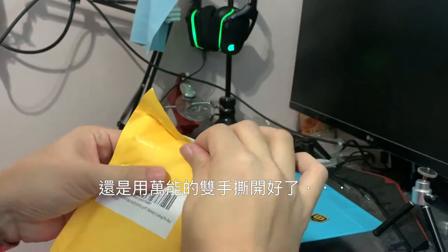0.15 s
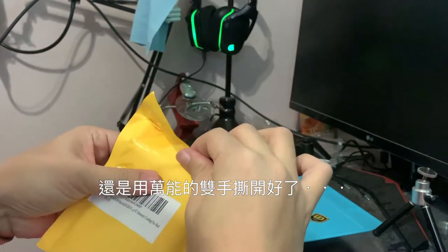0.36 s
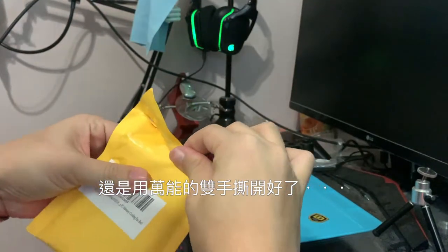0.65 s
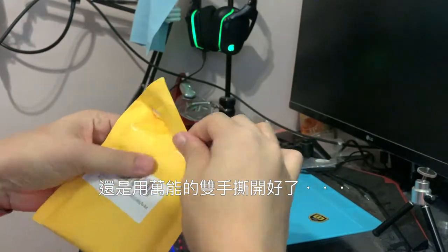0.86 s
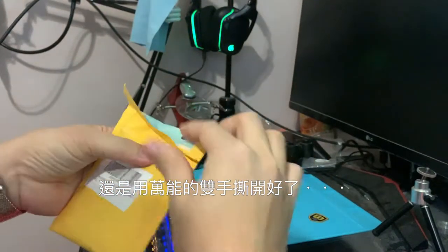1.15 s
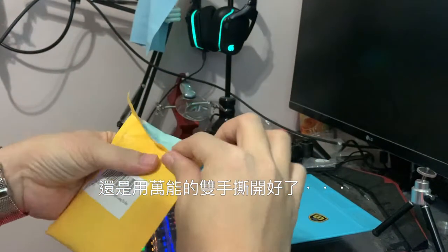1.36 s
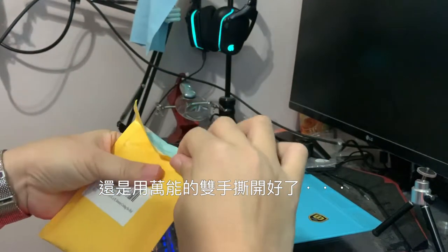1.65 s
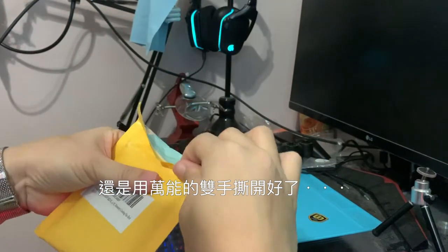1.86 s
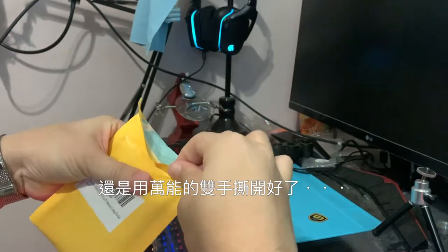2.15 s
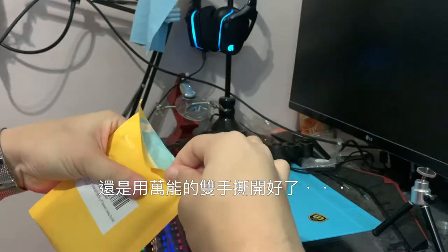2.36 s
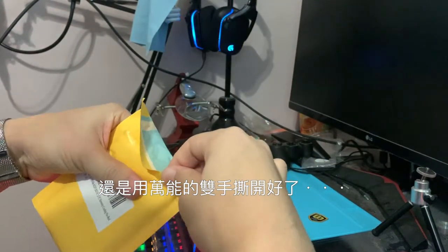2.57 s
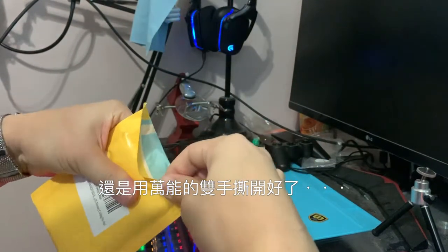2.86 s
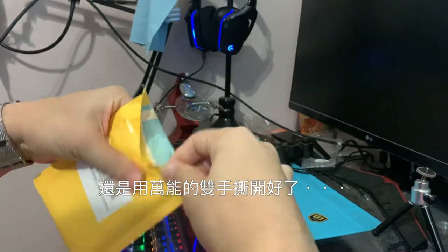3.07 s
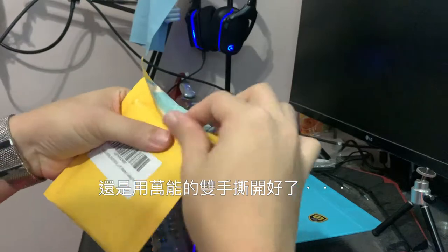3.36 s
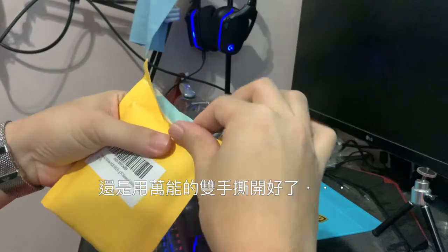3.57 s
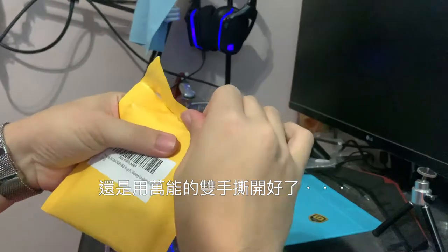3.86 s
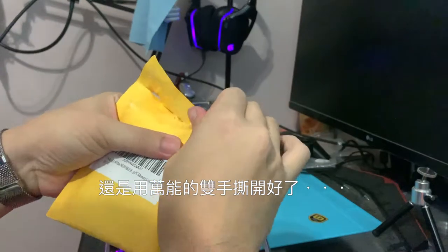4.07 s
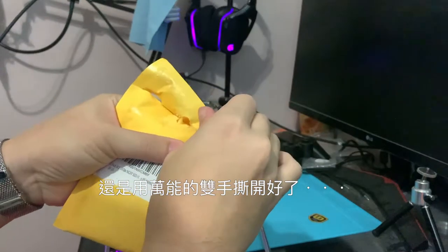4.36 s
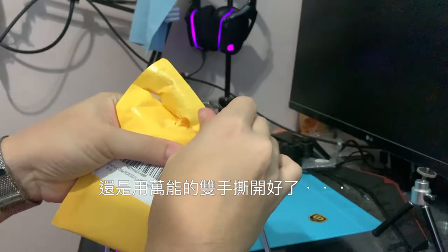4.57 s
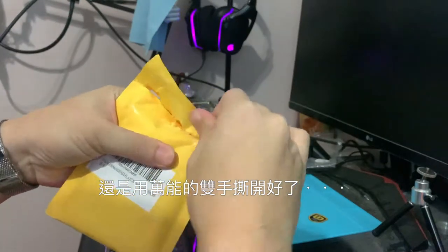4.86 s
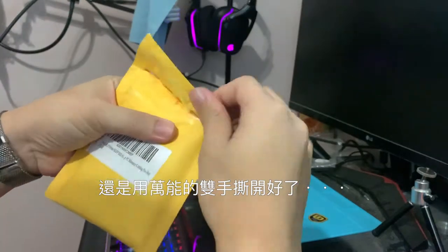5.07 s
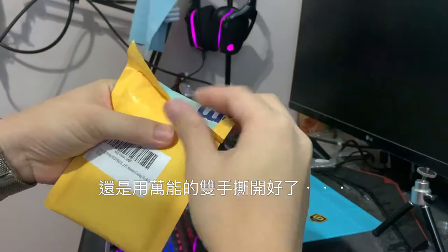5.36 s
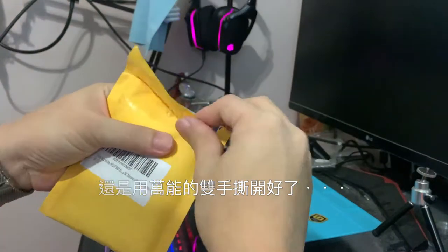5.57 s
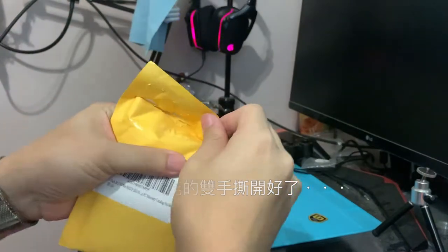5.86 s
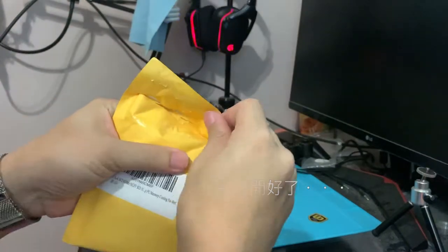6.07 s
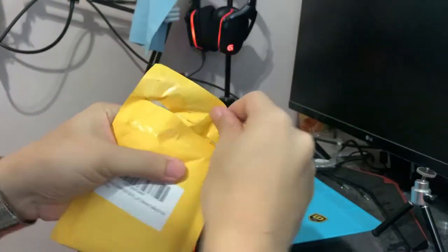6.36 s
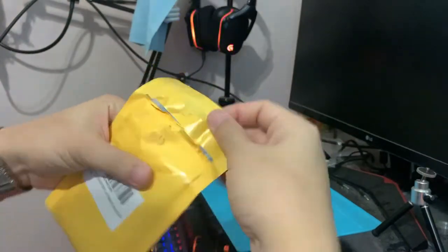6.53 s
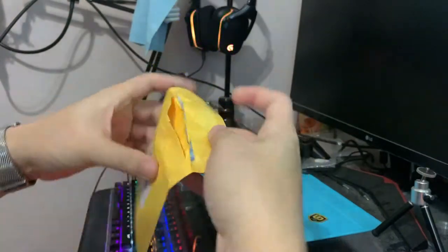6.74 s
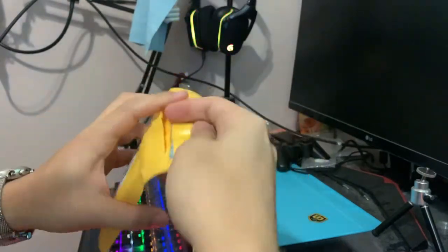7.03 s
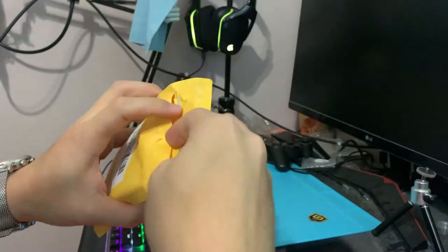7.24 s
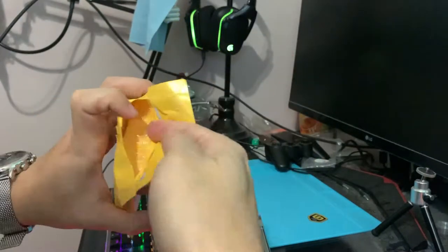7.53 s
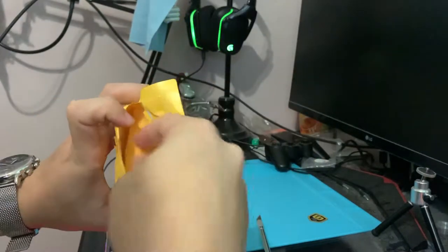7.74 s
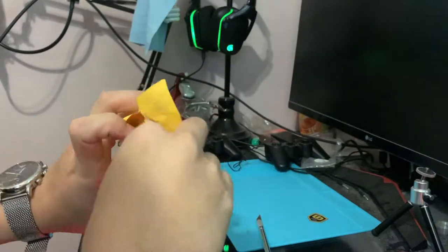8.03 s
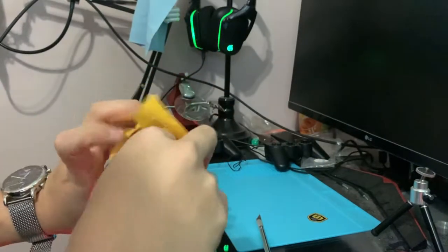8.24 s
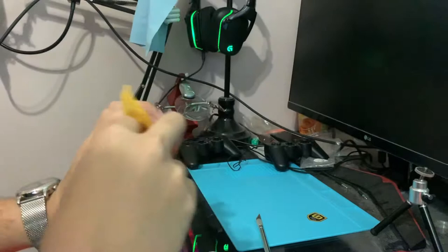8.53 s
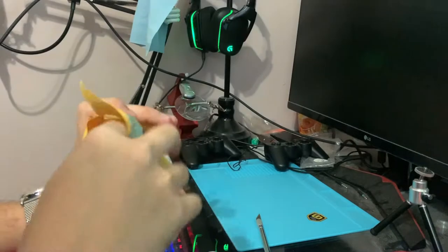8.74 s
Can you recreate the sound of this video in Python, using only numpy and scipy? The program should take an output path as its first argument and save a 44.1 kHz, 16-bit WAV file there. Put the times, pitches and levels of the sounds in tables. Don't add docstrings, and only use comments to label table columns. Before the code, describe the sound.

Close to a small microphone in a small room, hands work a padded paper envelope. Grainy rubbing, creasing snaps and tiny fibre crackles come in uneven bursts, then sharp ticks as the glue gives way. The flap rips in loud snaps, and fingers push the pouch open with hollow rustles and soft low thumps. A steady low fan hum runs throughout, deepening slightly past the middle.

```python
import sys
import numpy as np
from scipy import signal
from scipy.fft import rfft, irfft, next_fast_len
from scipy.io import wavfile
from scipy.ndimage import uniform_filter1d

SR = 44100
rng = np.random.default_rng(int(sys.argv[2]) if len(sys.argv) > 2 else 0)


def gain_from_db(level_db):
    decades = np.asarray(level_db, float) / 20
    return 10 ** decades


def to_wav(s):
    ch = np.atleast_2d(s).T
    pcm = np.round(np.clip(ch, -1, 1) * 32767)
    wavfile.write(sys.argv[1], SR, pcm.astype(np.int16))


N = 392490


def evened(x):
    return x / np.sqrt(np.mean(x ** 2) + 1e-20)


def read(points, hz):
    f, value = np.transpose(points)
    return np.interp(np.log(hz + 1), np.log(f + 1), value)


def add(mix, s, sound):
    part = mix[round(s * SR):][:len(sound)]
    part += sound[:len(part)]


# f/Hz, density/dB per Hz
AIR_SPECTRUM = [(18, -36), (30, 4.5), (65, 3), (109, -3), (255, 3), (443, -2), (676, -5.5), (979, -10.5),
                (1240, -10.5), (2740, -26), (6210, -48), (7880, -48), (14500, -42), (16500, -64)]
# f/Hz, width/Hz, level/dB
FAN_TONES = [(73.8, 3.2, -71.5), (136, 14.5, -67.5), (195, 11.3, -67.5), (234, 40, -66)]


def hum():
    air_db = -56.5
    blower_s, blower_hz, blower_db = 5.08, 130, -66.5
    size = next_fast_len(N)
    hz = np.fft.rfftfreq(size, 1 / SR)
    a, b = rng.standard_normal((2, len(hz)))
    out = gain_from_db(air_db) * evened(irfft((a + 1j * b) * gain_from_db(read(AIR_SPECTRUM, hz)), size))
    for f, width_hz, db in FAN_TONES:
        resonance = 1 / (1 + (2 * (hz - f) / width_hz) ** 2)
        out += gain_from_db(db) * evened(irfft((b + 1j * a) * resonance, size))
    blower = gain_from_db(blower_db) * evened(irfft((a - 1j * b) * hz / (1 + (hz / blower_hz) ** 6), size))
    fade_in = np.clip(10 * (np.arange(size) / SR - blower_s), 0, 1)
    return (out + blower * fade_in)[:N]


PAPER_EDGES_HZ = [620, 2500, 7000, 16300]


def shares(hz):
    above = [1 / (1 + (f / (hz + 1)) ** n) for f, n in zip(PAPER_EDGES_HZ, [3, 6, 6, -60])]
    body = above[0] * (1 - above[1])
    middle = above[1] * (1 - above[2])
    edge = above[2] * above[3] * 9000 / (hz + 2000)
    return np.array([body, middle, edge])


# t/s, effort/dB, body/dB re effort, edge/dB re effort
GRIP = [(0.0, -56.5, -2, -17), (0.45, -68.5, 3.5, -13), (0.82, -74, 3, -5), (1.2, -60, 2, -7),
        (1.75, -61.5, -7, -15), (1.95, -70.5, 0, -14), (2.9, -74, -28, -15), (3.14, -69.5, 7, -6),
        (3.5, -65.5, 0, -9), (3.92, -70, -7, -8), (4.2, -65, -7, 1), (4.7, -72, -3, -9),
        (5.5, -75.5, 5, -10), (5.7, -63.5, -7, -7), (6.1, -71, 4.5, -11), (6.93, -65.5, -2, -15),
        (7.9, -61, -4, -3), (8.9, -66.5, -1, -6)]
# t/s, hold/s, effort/dB, body/dB re effort, edge/dB re effort
STROKES = [(1.27, 0.029, -49.5, -4, -6), (1.524, 0.016, -53.5, -2, -9), (1.666, 0.0031, -49, 1.5, -10),
           (1.771, 0.068, -54.5, -2.5, -8), (2.564, 0.16, -70, -9, -7), (3.35, 0.0069, -55.5, 1, -13),
           (4.24, 0.16, -63, 0, 4), (3.43, 0.077, -62, 2, -5), (5.131, 0.12, -56, -1.5, -2.5),
           (5.3, 0.06, -52, -4, -10), (5.587, 0.017, -62, 5, -12), (6.236, 0.053, -56.5, 0, -9),
           (6.595, 0.24, -54, -3.5, -3.5), (7.1, 0.12, -58.5, -16, -6), (7.229, 0.0037, -49.5, -0.5, -4),
           (7.381, 0.16, -58, 4, -1), (7.634, 0.0038, -50.5, -10, 0), (7.995, 0.067, -51, -4, -3),
           (8.538, 0.0038, -51.5, 2.5, 0), (8.66, 0.068, -58, 5, -6), (8.79, 0.035, -57.5, -2.5, -3)]
SLIPS = [(0.102, 0.014, -49.5, -5, -6), (0.985, 0.14, -52.5, -4.5, -10), (1.168, 0.0036, -43, -2.5, -8),
         (2.117, 0.022, -53.5, -2, -6), (4.362, 0.076, -54.5, 0, 4), (3.24, 0.0021, -43, -7, -9),
         (3.965, 0.025, -58, 0, -15), (4.56, 0.014, -50, -4.5, -1.5), (5.756, 0.035, -44, -0.5, -30),
         (5.79, 0.01, -45.5, -6, -1), (5.918, 0.014, -56, -4, 0), (6.328, 0.0031, -38, -6, -5),
         (8.071, 0.021, -45, -3, -21), (8.224, 0.075, -48, -2, -5), (8.32, 0.014, -45, -8, -6),
         (1.366, 0.044, -53.5, -8, -4)]


def effort():
    swell_db_per_s, ease_db_per_s = 282, 320
    jump_db_per_s, settle_db_per_s = 886, 248
    t = np.arange(0, N / SR + .01, .001)
    s, level, body, edge = np.transpose(GRIP)
    power = np.array([gain_from_db(2 * np.interp(t, s, level + c)) for c in (0, body, edge)])
    moves = ((STROKES, swell_db_per_s, ease_db_per_s), (SLIPS, jump_db_per_s, settle_db_per_s))
    for rows, rise, fall in moves:
        for at, hold_s, db, body_db, edge_db in rows:
            shape_db = db - rise * np.maximum(at - t, 0) - fall * np.maximum(t - at - hold_s, 0)
            power = power + gain_from_db(2 * (shape_db + np.array([[0], [body_db], [edge_db]])))
    total_db = 10 * np.log10(power)
    return t, total_db[0], total_db[1] - total_db[0], total_db[2] - total_db[0]


# t/s, length/s, f/Hz, boost/dB
POCKETS = [
    (1.545, 0.047, 3400, 8),
    (1.668, 0.04, 2880, 15.5),
    (7.646, 0.014, 1480, 7),
    (8.083, 0.034, 1330, 15.5),
    (8.09, 0.028, 2700, 12),
    (8.234, 0.064, 1070, 15.5),
    (8.276, 0.017, 1520, 15),
]


def rustle():
    grains_per_s, pocket_width = 700, 0.12
    clumps = evened(uniform_filter1d(uniform_filter1d(rng.standard_normal(N), size=500), size=500))
    size = gain_from_db(3.4 * np.minimum(rng.exponential(1, N), 2.1))
    size = size * (rng.random(N) < grains_per_s / SR * gain_from_db(4 * clumps))
    uneven = gain_from_db(4.5 * np.minimum(rng.standard_normal((3, N)), 1))
    grains = signal.lfilter([1], [1, -.92], size * uneven) * rng.standard_normal(N)

    s, *columns = effort()
    fused = gain_from_db(0.28 * (np.interp(np.arange(N) / SR, s, columns[0]) + 56))
    hiss = rng.standard_normal(N) * gain_from_db(1.5 * clumps)
    drive = (evened(grains) + fused * hiss) / np.sqrt(1 + fused ** 2)

    hz, t, z = signal.stft(drive, SR, nperseg=256, noverlap=192)
    effort_db, body_db, edge_db = (np.interp(t, s, c) for c in columns)
    layers = [row * share[:, None] for row, share in zip(z, shares(hz))]
    field = sum(gain_from_db(db) * x / np.sqrt(np.mean(abs(x) ** 2)) for db, x in zip([body_db, 0, edge_db], layers))

    folds = uniform_filter1d(rng.standard_normal(field.T.shape), size=14, axis=0)
    folds = uniform_filter1d(folds, size=7, axis=1).T
    colour_db = 3.02 * evened(folds)
    for at, length_s, pocket_hz, db in POCKETS:
        off_pitch = (hz[:, None] / pocket_hz - 1) / pocket_width
        colour_db = colour_db + db * np.exp(-((t - at) / length_s) ** 2 - off_pitch ** 2)
    plain = signal.istft(field, SR, nperseg=256, noverlap=192)[1]
    shaped = signal.istft(field * gain_from_db(effort_db + colour_db), SR, nperseg=256, noverlap=192)[1]
    return gain_from_db(0.5) * shaped[:N] / np.std(plain)


def snap(db, low_db, edge_db, crack, travel, bands):
    flip_gain, flip_s = 2.6, .00003
    dip_hz, dip_width, dip_db = 2350, 0.18, -5
    thin_hz, band_width = 694, 0.11
    t, hz = np.arange(len(crack)) / SR, np.fft.rfftfreq(len(crack), 1 / SR)
    late = np.maximum(t - .004, 0)
    ring_s = 0.0048 + 0.00053 * np.clip(low_db + 13, 0, 12)
    lasts_s = ring_s * np.array([[1.6], [1], [.7]])
    flip = flip_gain * np.exp(-((late - .0003) / flip_s) ** 2) * np.sign(crack[0])
    bursts = (crack * (1 - np.exp(-late / 0.00028)) + flip) * gain_from_db(-60 * late / lasts_s)

    spread = np.exp(-2j * np.pi * 0.0837 * (0.33 + travel) * (np.sqrt(hz) - hz / 140))
    dip = gain_from_db(dip_db * np.exp(-(np.log((hz + 1) / dip_hz) / dip_width) ** 2))
    shaping = dip / (1 + (thin_hz / (hz + 1)) ** 4)
    parts = irfft(rfft(bursts) * spread * shares(hz) * shaping)
    peaks = np.sqrt(uniform_filter1d(parts ** 2, size=64).max(axis=1))
    mixed = (gain_from_db(np.array([low_db - 4.0, 0, edge_db + 0.5])) / peaks) @ parts
    colour_db = sum(gain_db * np.exp(-(np.log((hz + 1) / f) / band_width) ** 2) for f, gain_db in bands)
    return gain_from_db(db) * irfft(rfft(mixed) * gain_from_db(colour_db))


# t/s, peak level/dB, low body/dB re peak, bright edge/dB re peak
PRYING = [(0.1013, -35.5, 10, -9), (0.112, -62, 12, -8), (0.1427, -44, -1, -12), (0.1541, -47.5, 3, 0),
          (0.2444, -66, 5, 21), (0.5475, -49, -27, -2), (0.8271, -72, -7, 20), (0.9773, -40, -1.5, -16),
          (0.994, -40, -6, -11), (1.0456, -44, -18, -16), (1.0953, -46, -1, -22), (1.1224, -44, 6, -12),
          (1.1626, -29, 1.5, -6.5), (1.1713, -34, 4, -17), (1.4038, -41, -1.5, -10),
          (1.7593, -39.5, 1, -15), (1.7647, -34, -13, -10), (1.8229, -47.5, 7.5, -10),
          (2.1177, -43.5, 8.5, 1), (2.1269, -47.5, 1, 5), (2.5539, -54, 0.5, 12),
          (2.6033, -56.5, 2.5, 12.5), (3.0882, -49, 5.5, -14), (3.1825, -48.5, 1.5, -4),
          (3.2349, -36, 1.5, -5), (3.2391, -33.5, 3, -3), (3.4958, -50, 7, -10), (3.5661, -45.5, 6.5, -1.5)]
TUGGING = [(3.895, -53, 18, -15), (3.9588, -29.5, 5, -6.5), (3.984, -45, 0, -5), (4.0566, -67, 23, -9),
           (4.146, -49, 2.5, 0.5), (4.275, -47.5, 12, -2), (4.3158, -47.5, 8, 4), (4.3274, -47.5, -17, 2),
           (4.365, -47, -6, 5.5), (4.3712, -47, 4, 5), (4.408, -38.5, -13, -7), (4.432, -49.5, 16.5, 9),
           (4.441, -50, 16, 11), (4.4819, -53, -19, 16), (4.5118, -54.5, 8, 9), (4.553, -45, -18, -5),
           (4.5551, -24.5, 0, -5), (4.874, -52.5, 8, -33), (4.9002, -57.5, 13.5, -12),
           (4.9516, -44, -39, -12), (5.2024, -44.5, 8.5, -6), (5.2884, -46, 4, -3), (5.2944, -33.5, 7, 2),
           (5.3416, -35.5, -4, -10), (5.3524, -34.5, -3, -6), (5.585, -47, -2, -6), (5.593, -58, 13, -13)]
RIPPING = [(5.749, -27, -6.5, -31), (5.7514, -21, -4, -35), (5.759, -27.5, 1.5, -13),
           (5.7619, -25, -10, -32), (5.7688, -36.5, 0, -21), (5.789, -34.5, 2.5, 0),
           (5.8246, -42, -13, -11), (5.8373, -40.5, 1, -13), (5.9119, -21, -9, -4), (5.9168, -36, -2, 5),
           (5.98, -46.5, -6, -6), (6.2185, -44.5, 3.5, -11), (6.243, -28.5, -5, -29), (6.2727, -47, 4, 7.5),
           (6.2796, -38, -1, -8), (6.3203, -45, 14, -6), (6.325, -21.5, 4, 2), (6.349, -58, 8, -6),
           (6.335, -30, -1, -15), (6.34, -31, -9, -15), (6.4644, -60, 15, -7), (6.5472, -43.5, -29, -5),
           (6.58, -47, 9.5, -26), (6.586, -52, 10, 18.5), (6.5918, -33.5, -8, 2), (6.6217, -40.5, -0.5, 3),
           (6.6595, -33.5, 0, -32), (6.7824, -40, 3, -2), (6.9476, -50, 12.5, -27)]
OPENING = [(7.195, -37.5, -4, 4), (7.2206, -39, -1, -8), (7.2392, -44, 1.5, -9), (7.265, -54, -22, -10),
           (7.352, -50, -12, 8.5), (7.3746, -44, 7, -7), (7.3924, -45.5, -3, -15), (7.454, -58, 12, 9),
           (7.482, -49, -15, -2), (7.52, -47.5, -22, 9.5), (7.5339, -66, 8, 5), (7.5779, -39, 11.5, -0.5),
           (7.605, -42.5, 3, -8), (7.632, -32, 5.5, -3), (7.713, -47.5, 5, -3), (7.796, -50, -3, 0),
           (7.868, -47, 1, 2), (7.9836, -37.5, -7, -6), (8.0163, -52.5, 17.5, -10), (8.061, -41.5, -15, 0),
           (8.0693, -30.5, 5.5, -13.5), (8.0745, -53, -1, -22), (8.1443, -62.5, 18, -12),
           (8.2066, -58, 16, -3), (8.3213, -46, -18, -3), (8.3342, -48, 8, 9)]
# t/s, peak level/dB
TICKS = [(0.017, -56), (0.2025, -50), (2.983, -68), (3.046, -66), (0.611, -63), (0.6711, -52.5),
         (0.7431, -55.5), (1.1, -55), (1.5729, -59), (2.0849, -54.5), (2.685, -60), (3.544, -60),
         (2.905, -50), (4.221, -54), (4.2518, -57), (3.552, -65), (5.9, -56.5), (5.0354, -62.5),
         (3.639, -58), (6.957, -59.5), (6.2062, -56), (6.301, -45), (6.445, -56), (7.0689, -58),
         (4.4713, -55), (7.077, -54), (7.3103, -57), (7.5608, -47), (7.2, -50), (8.5116, -51)]
# t/s, f/Hz, gain/dB
SNAP_BANDS = [(0.1013, 587, 14), (0.1013, 7450, -18), (1.1626, 890, -32), (1.1713, 760, -25),
         (1.1713, 1110, -25), (3.2391, 2390, -25), (3.9588, 2260, -10), (4.5551, 2830, -18),
         (5.2948, 1940, -13), (5.2948, 1130, -23), (5.762, 696, 21), (5.9119, 9300, -13),
         (5.9119, 4300, -14), (6.325, 810, 10), (6.325, 2350, 12), (7.5783, 12000, -17), (7.5783, 7260, 17),
         (7.6321, 1850, -8), (8.0699, 8300, 10.5), (8.0699, 2300, 9.5),
         (3.9588, 3000, -13),
]


def snaps():
    tick_body_db, tick_edge_db, tick_spread_db = -3.5, -1.5, 5
    tints = tick_spread_db * rng.standard_normal((len(TICKS), 2)) + [tick_body_db, tick_edge_db]
    rows = PRYING + TUGGING + RIPPING + OPENING
    rows = rows + [(*tick, *tint) for tick, tint in zip(TICKS, tints)]
    cracks, travels = rng.standard_normal((len(rows), 1024)), rng.random(len(rows))
    folds = SNAP_BANDS
    owner = [np.argmin([abs(row[0] - fold[0]) for row in rows]) for fold in folds]
    out = np.zeros(N)
    for k, ((s, *row), crack, travel) in enumerate(zip(rows, cracks, travels)):
        bands = [fold[1:] for fold, j in zip(folds, owner) if j == k]
        add(out, s - .0044, snap(*row, crack, travel, bands))
    return out


# t/s, peak level/dB,
# f/Hz
CRACKLES = [(0.0834, -39, 6700), (0.114, -37, 2920), (0.1162, -39, 6700), (0.2265, -48, 2920),
            (0.3408, -50.5, 1520), (0.42, -44.5, 3020), (0.436, -53, 1280), (0.5782, -47, 7910),
            (0.6103, -49, 1780), (0.643, -51, 4810), (0.652, -43, 6700), (0.6999, -48, 6700),
            (0.8561, -49, 13000), (0.9359, -46.5, 4030), (1.0067, -48, 1300), (1.0067, -38, 5700),
            (1.095, -35, 3450), (1.253, -51, 1400), (1.4258, -50, 2900), (1.5605, -47, 5700),
            (1.3874, -44, 1810), (1.768, -37, 3450), (1.8455, -51, 1400), (1.7286, -49, 2800),
            (1.7221, -48, 5700), (1.99, -50, 2480), (2.4544, -52, 5680), (2.5214, -53, 2920),
            (2.742, -49, 4000), (2.888, -50, 4810), (3.158, -46, 4810), (3.4926, -48, 10000),
            (3.3594, -51.5, 790), (3.427, -51.0, 2920), (3.443, -45, 7910), (3.4466, -44, 5680),
            (3.5614, -37, 7910), (3.6389, -48, 1510), (3.6577, -55, 7910), (3.8248, -53, 5680),
            (3.8466, -51.5, 1280), (3.9341, -55, 3400), (4.092, -50.5, 4810), (4.1022, -46, 13000),
            (4.1381, -38, 11010), (4.1725, -46, 11010),
            (4.2748, -27.5, 7960), (4.3332, -35, 6700), (4.3471, -44, 11010), (4.3771, -42.0, 6700),
                   (4.38, -35, 7910), (4.3935, -49.5, 1080), (4.4025, -41, 6000), (4.4329, -36.0, 11010),
                   (4.5342, -33, 13000), (4.5756, -39, 6700), (4.6729, -45.5, 7900), (4.856, -52, 6660),
                   (4.9183, -45, 7910), (4.9223, -52, 925), (4.9757, -51, 5680), (4.9862, -52, 7910),
                   (5.0076, -51, 7910), (5.2037, -45, 1300), (5.262, -41, 9330), (5.282, -37, 9330),
                   (5.2885, -40.0, 9330), (5.3144, -44.0, 4070), (5.481, -53, 2920), (5.5943, -42.5, 1770),
                   (5.6636, -53, 3450), (5.6696, -46, 5680), (5.6811, -48, 5680), (5.2391, -40, 11000),
                   (5.7814, -35.0, 3450), (5.7819, -28, 13000), (5.8073, -33, 3450), (5.8128, -42, 1280),
                   (5.8786, -41, 13000), (5.9679, -48, 7910), (6.0218, -48, 7910), (6.0278, -49, 9330),
                   (5.955, -48, 2900), (6.1206, -52, 1505), (6.1276, -48, 13000), (6.1331, -53, 4810),
                   (6.141, -51, 5680), (6.1889, -53, 4810), (6.1999, -53, 9330), (6.2443, -36.5, 1060),
            (6.3278, -32, 1100), (6.341, -32, 1520), (6.3471, -31, 6700), (6.3486, -37, 660),
                 (5.3577, -38, 1690), (6.4304, -42, 5680), (6.449, -44, 4070), (6.5247, -42, 11010),
                 (6.5481, -42, 3480), (6.586, -30, 13000), (6.5867, -46, 1510), (6.6052, -44, 1510),
                 (6.6783, -42.0, 5680), (6.7791, -44, 5680), (6.7906, -36, 7910), (6.9575, -43, 1490),
                 (6.9932, -47, 5680), (7.0325, -49, 4810), (7.1183, -53, 4070), (7.2653, -38, 5680),
                 (7.3658, -46.0, 6700), (7.4246, -47.0, 13000), (7.4413, -42, 4810), (7.479, -39, 5680),
                 (7.5015, -40, 9330), (7.5116, -30, 7910), (7.5342, -43.5, 780), (7.5783, -23.5, 6700),
                 (7.6202, -42, 7910), (7.5853, -38, 6500), (7.6352, -42, 690), (7.6376, -36, 5680),
                 (7.6965, -44, 5680), (7.8023, -36, 9330), (7.8756, -45, 11010), (7.9255, -43, 9330),
                 (7.942, -36, 10800), (7.702, -42, 11000), (8.162, -45, 5700), (8.0642, -41, 1280),
                 (8.147, -45.5, 790), (8.2128, -40, 7910), (8.228, -45, 1510), (8.2341, -44, 1080),
                 (8.2792, -40.0, 5680), (8.2823, -43, 1280), (8.3253, -38, 4070), (8.3625, -47.0, 4810),
                 (8.3765, -39, 11010), (8.5358, -51, 1080), (8.583, -47.5, 2090), (8.7126, -41.5, 1900)]


def crackles():
    cycles, thinness, sag, gain_db = 0.68, 0.23, 0.39, 4.5
    follow_gain, follow_s = -.6, .0016
    out, rows = np.zeros(N), CRACKLES
    for (s, db, hz), lags in zip(rows, rng.random((len(rows), 2))):
        lasts_s = cycles / hz * (1500 / hz) ** thinness
        u = np.arange(0, 7, 1 / (lasts_s * SR))
        turns = hz * lasts_s * u * (1 + sag * np.exp(-u))
        click = gain_from_db(db + gain_db) * u * np.exp(1 - u) * np.sin(2 * np.pi * turns)
        add(out, s - lasts_s, click)
        for lag in lags:
            add(out, s - follow_s * (lag - .2), follow_gain * click)
    return out


# t/s, level/dB, start f/Hz, end f/Hz, t60/s
THUMPS = [
    (0.098, -38, 480, 295, 0.039),
    (1.163, -25.5, 626, 350, 0.011),
    (5.2962, -32, 885, 420, 0.025),
    (5.752, -35, 685, 326, 0.048),
    (6.326, -32, 700, 180, 0.04),
    (7.579, -23, 890, 504, 0.011),
    (7.222, -36, 454, 344, 0.043),
    (8.044, -37.5, 159, 90, 0.055),
    (8.2795, -30, 250, 120, 0.075),
    (8.333, -34, 220, 100, 0.05),
]


def thumps():
    sag_s, attack_s = 0.0031, 0.00088
    out, t = np.zeros(N), np.arange(6000) / SR
    for s, db, start_hz, end_hz, t60 in THUMPS:
        hz = end_hz + (start_hz - end_hz) * np.exp(-t / sag_s)
        tone = np.sin(2 * np.pi * np.cumsum(hz) / SR)
        add(out, s, gain_from_db(db - 60 * t / t60) * tone * np.minimum(t / attack_s, 1))
    return out


# f/Hz, t60/s
ROOM_DECAY = [(300, 0.49), (800, 0.16), (2100, 0.077), (5500, 0.087), (14000, 0.067)]


def room():
    taps = np.zeros(SR // 2)
    at = np.arange(120, SR // 2 - 20, 12)
    taps[at + rng.integers(0, 12, len(at))] = rng.choice([-1., 1.], len(at))
    hz, t, z = signal.stft(taps, SR, nperseg=256)
    tail = signal.istft(z * gain_from_db(-60 * t / read(ROOM_DECAY, hz)[:, None]), SR, nperseg=256)[1]
    return tail / np.linalg.norm(tail)


def scene():
    echo_db = -11
    folds, rub, echoes, air = snaps(), rustle(), room(), hum()
    ticks = folds + crackles()
    wet = signal.oaconvolve(gain_from_db(echo_db) * (ticks + rub), echoes)[:N]
    return (ticks + rub + thumps() + wet + air)[None]


def roll_off(x):
    return signal.sosfilt(signal.butter(12, 16830, fs=SR, output="sos"), x)


def record(dry):
    limited = signal.oaconvolve(dry, signal.firwin(1023, 16000, fs=SR)[None], "same")
    limited = signal.lfilter(*signal.butter(2, 42, "high", fs=SR), limited)
    return roll_off(limited)


dry = scene()
out = record(dry)
to_wav(out)
```